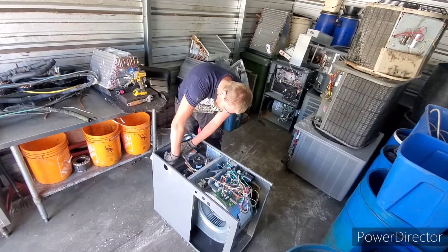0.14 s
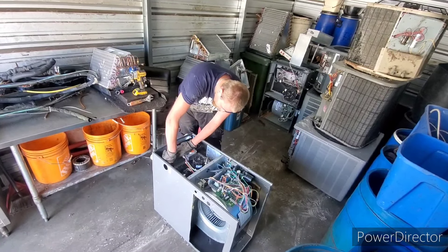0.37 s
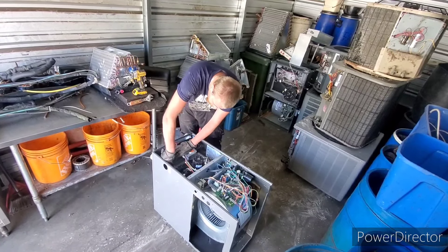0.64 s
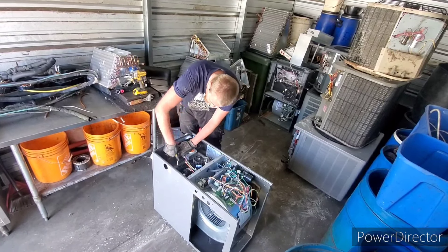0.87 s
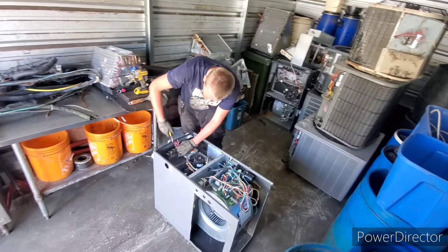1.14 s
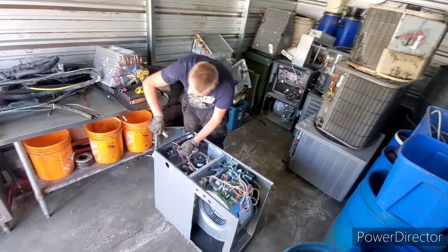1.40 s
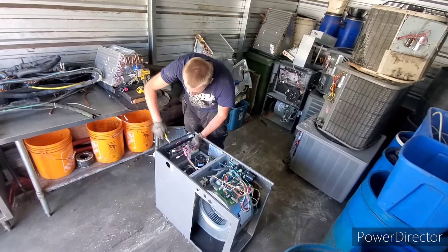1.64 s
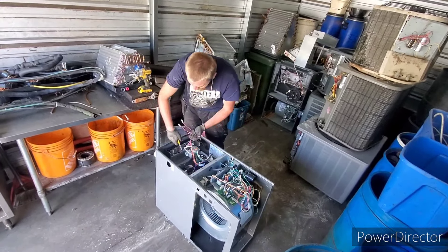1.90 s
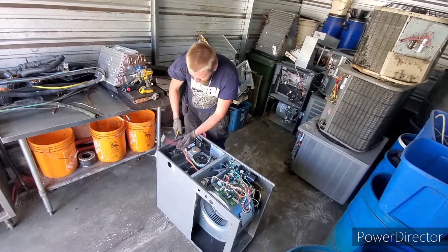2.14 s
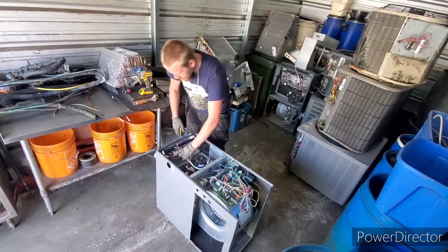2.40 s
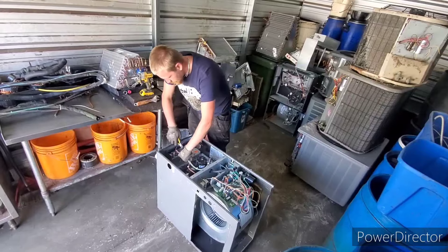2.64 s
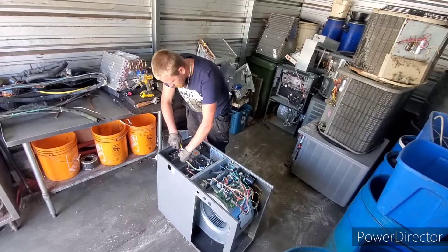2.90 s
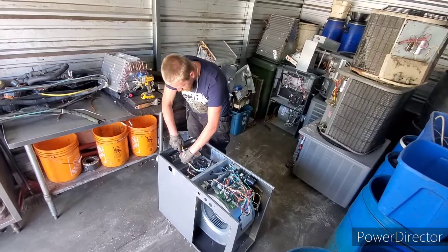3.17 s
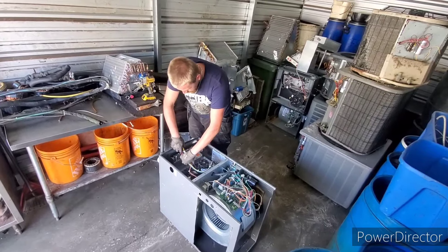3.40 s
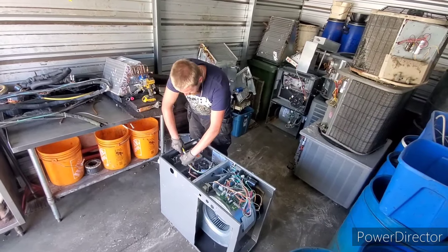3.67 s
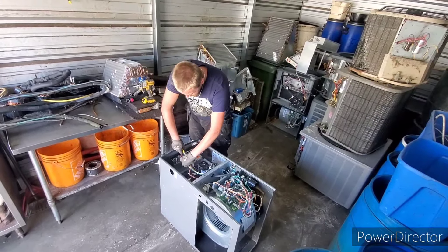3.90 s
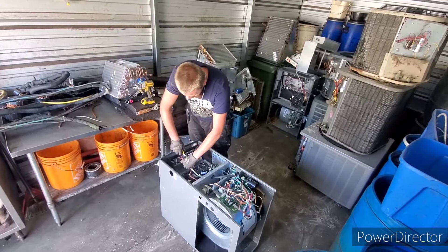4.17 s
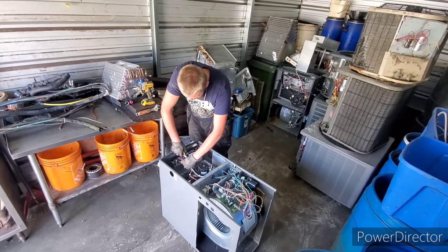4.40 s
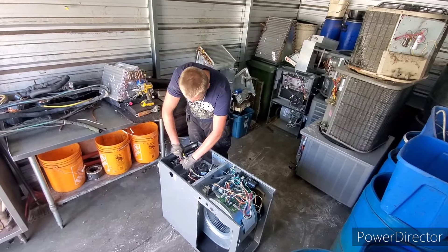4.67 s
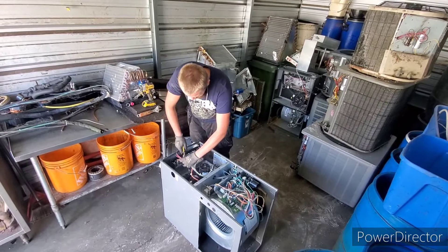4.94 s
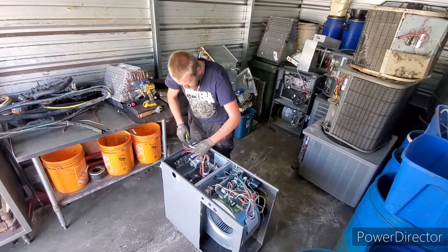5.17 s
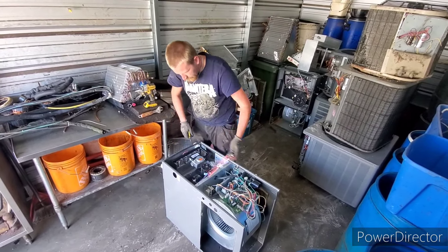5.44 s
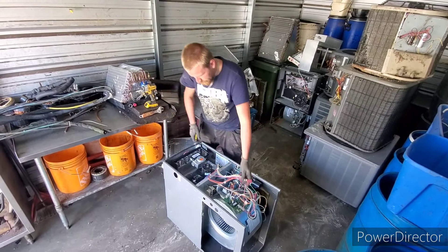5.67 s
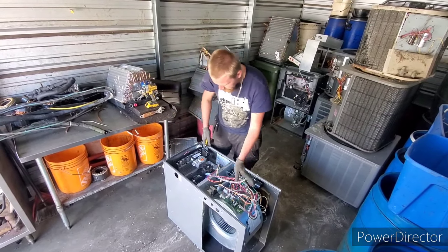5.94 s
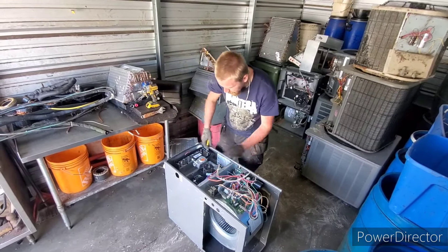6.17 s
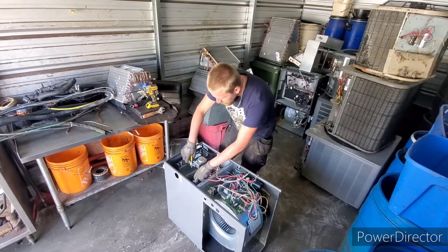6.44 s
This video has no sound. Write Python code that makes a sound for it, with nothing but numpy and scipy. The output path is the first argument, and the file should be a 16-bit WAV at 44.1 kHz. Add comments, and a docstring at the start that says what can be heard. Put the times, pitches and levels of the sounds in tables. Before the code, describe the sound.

Wire cutters snap sharply through cables inside an open sheet-metal cabinet, with ticks, dull knocks and short wire scrapes in a tin shed.

```python
"""In a tin shed, wire cutters snip cables inside an open sheet-metal cabinet, a few metres from a stereo microphone.
Snaps and ticks are evenly coloured contact bursts filtered to a clack; the snaps also excite decaying steel modes.
Taps and knocks ring damped rim and panel modes; wires dragged over metal are dense streams of random slips.
The shed adds a short bright tail of noise that dies band by band, and a distant rumble and hiss lie beneath."""
import sys
import numpy as np
from scipy import signal
from scipy.fft import rfft, irfft
from scipy.io import wavfile
from scipy.ndimage import uniform_filter1d

SR = 44100
rng = np.random.default_rng(int(sys.argv[2]) if len(sys.argv) > 2 else 0)


def makeup_ratio(level_db):
    """Linear amplitude ratio for a level in decibels (20 dB per factor of ten)."""
    decades = np.asarray(level_db, float) / 20
    return 10 ** decades


def dump_mix(stems):
    """Bounce the given channels to the path in sys.argv[1] as a 16-bit WAV at rate SR."""
    frames = np.atleast_2d(stems).T  # one column per channel
    limited = np.clip(frames, -1, 1)  # hard clip at full scale
    pcm = np.round(limited * 32767).astype(np.int16)
    wavfile.write(sys.argv[1], SR, pcm)


N = 289296  # length in samples

# Cutter snaps: [t/s, level/dB, jaw ring f/Hz, body below 1.5 kHz level/dB, direct path level/dB]
# The direct path is higher when the cabinet wall does not hide the jaws.
SNIP_EVENTS = [(1.692, 3.5, 2870, -21, 0), (1.816, 7, 5830, 1.5, -1.5), (2.3818, -14, 2870, -25, 5),
               (2.9170, 5, 2780, 7.5, -2.5), (4.0049, 13, 4900, -0.5, -1.5), (4.971, 4, 2860, 4.5, -2),
               (5.9644, -4.5, 2430, -11, 5.5), (6.3600, 7.5, 3500, -10.5, 10)]
SNIP_EDGE_DB, SNIP_CHATTER_MS = -6, 2
# Modes of the cutter's steel after a snap: [f/Hz, bandwidth/Hz, relative level/dB]
STEEL_MODES = [(2855, 17, -15.5), (4430, 330, -5), (4770, 67, -11.5), (5015, 53, -2), (5875, 36, -19.5),
               (5930, 100, -1.5), (6620, 21.5, -2), (7260, 41, 1.5), (8000, 42, -9), (8770, 33, -4.5)]
STEEL_DB, STEEL_SCATTER_DB = -38, 2  # offset of all modes; spread of each mode from snap to snap

# Wire ends and the tool ticking on metal:
# [t/s, level/dB, ring f/Hz, body below 1.5 kHz level/dB, edge above 8 kHz level/dB]
TICK_EVENTS = [(0.385, -27, 1550, 4, -12), (0.6548, -8, 1630, -3, -11.5), (1.0774, -19.5, 4000, -5, -22),
               (1.296, -26, 2170, 20, -27), (1.3673, -22.5, 2200, -2, -1), (1.4094, -15, 5800, -30, -1),
               (1.6362, -22, 5500, 17, -13), (1.6701, -4, 2950, 13, -6), (2.0043, -13, 2780, 16.5, -19),
               (2.0512, -11.5, 1930, 12.5, -29), (2.495, -10, 2400, 1, 0), (2.6269, -2.5, 2960, -25, -12),
               (2.6459, 7, 4160, 8.5, -10.5), (2.6851, 5.5, 3740, -4, -6.5), (2.7174, 6, 2270, -10, -10),
               (2.7606, 7.5, 1580, 4, -8.5), (2.8621, -2.5, 1790, 0, -16), (3.1262, -19, 3460, -12, -13),
               (3.3854, -27, 2860, 10.5, -12), (3.5433, -43, 3710, 12, -2), (3.6733, -34, 3590, 8, -10),
               (3.8307, -22, 4160, 3, -6.5), (4.532, -21.5, 1530, 22, -17), (4.5639, -9.5, 2250, -8, -15.5),
               (4.7382, -3.5, 2040, 10.5, -10), (5.1029, -12.5, 3030, 5, -42), (5.223, -11, 3100, 6, -2.5),
               (5.2954, -8, 1650, 25.5, -16), (5.5444, -19, 1890, 13, -17), (5.7159, -15, 1990, 14.5, -13),
               (5.771, -14, 2780, 4, -9), (5.8849, -11.5, 2750, -11, -7.5), (5.9504, 1.5, 3560, -0.5, -13),
               (6.0867, -5.5, 2350, 2.5, -12), (6.11, -12, 2470, -17, -9)]
TICK_CHATTER_MS = 4.27

# Dull taps of a hand, tool handle or whipping wire on the cabinet rim: [t/s, level/dB, f/Hz]
TAP_EVENTS = [(0.659, -20.5, 938), (1.317, -39, 855), (1.41, -42, 1140), (1.467, -39, 1035),
              (1.591, -34.5, 1000), (1.797, -25, 1296), (2.004, -41, 764), (2.917, -17.5, 1190),
              (3.385, -35.5, 783), (3.477, -30.5, 960), (4.007, -8.5, 994), (5.295, -41, 1090)]
TAP_T60_S, TAP_UPPER_RATIO = 0.06, 1.27

# Knocks on the cabinet:
# [t/s, deep panel level/dB, upper panels level/dB, shaking time/ms, f/Hz of the panel nearest the blow]
KNOCK_EVENTS = [(0.606, -61, -50, 13, 616), (0.650, -40.5, -42, 6.4, 295), (1.367, -49.5, -56, 13, 500),
                (1.606, -43, -57, 15, 400), (1.668, -28.5, -34.5, 6, 302), (1.82, -24.5, -37, 14.3, 336),
                (2.004, -44.5, -45.5, 5.1, 600), (2.505, -62, -46, 27, 450), (2.643, -67, -45.5, 15, 560),
                (2.764, -44.5, -46.5, 7.8, 590), (2.921, -69, -43.5, 15.5, 520),
                (3.406, -36, -59, 6.4, 398), (3.477, -38, -57.5, 13, 500), (3.551, -52, -69, 9.7, 397),
                (4.009, -29, -43, 24, 410), (4.531, -42, -38.5, 15, 400), (4.546, -55, -39, 5, 500),
                (4.565, -25.5, -36, 14, 350), (4.987, -33, -47, 16.5, 450), (5.244, -57, -45, 16, 440),
                (5.293, -68, -36, 21, 368), (5.327, -51, -38.5, 26, 376), (5.436, -63, -39.5, 5.3, 520),
                (5.678, -56, -53, 14, 450), (5.771, -41.5, -44.5, 11.7, 443), (6.155, -36.5, -66, 17, 600),
                (6.2, -30.5, -51.5, 8.2, 605), (6.36, -45, -43, 7.4, 406), (6.488, -66, -52.5, 29, 570)]
# Modes of the cabinet panels: [f/Hz, relative level/dB, t60/s]
PANEL_MODES = [(192.7, 0.5, 0.14), (202, -1.5, 0.38), (224.6, -7, 0.45), (296, -9.5, 0.064),
               (307.4, -9, 0.13), (372.4, -3.5, .15), (397, -10.5, 0.24), (488.5, 10.5, 0.033),
               (533.4, -3.5, 0.17), (585, -5.5, 0.031), (656, -4.5, 0.033), (764, 2, 0.031),
               (932, -13, 0.03)]
DEEP_HZ = 250  # modes below this belong to the deep side panel
PANEL_SCATTER_DB = 2  # spread of each upper mode from knock to knock
NEAR_PANEL_DB, NEAR_PANEL_SPREAD = 7, 0.15  # lift of the nearest panel; its reach in log frequency

# Bouts of wires dragged over each other and over metal edges, one list per bout:
# [t/s, scrape level/dB, body 0.3-1 kHz level above the scrape/dB]
DRAG_BOUTS = [
    [(1.05, -63, -2), (1.13, -66.5, -13), (1.322, -63.5, -5), (1.45, -63, 8), (1.652, -63.5, -2)],
    [(1.97, -74, 14), (2.045, -61, -3), (2.06, -40.5, -5), (2.13, -84, 0)],
    [(2.38, -77, 19), (2.46, -65, 7), (2.558, -56, -13), (2.682, -46.5, 9.5), (2.802, -51, -9),
     (2.882, -46.5, -4), (2.95, -56, -19)],
    [(3.7, -83, -11), (3.95, -65.5, 1)],
    [(4.55, -66, 19.5), (4.72, -60, 4), (4.745, -44, 1.5), (4.82, -33, -7), (4.912, -51, 3.5),
     (5.06, -63, 14.5), (5.246, -49.5, -4.5), (5.394, -43, 4), (5.518, -64.5, 15)],
    [(5.6, -56.5, 2.5), (5.8, -60, 5), (6.01, -46, -3.5), (6.09, -47, -5.5), (6.176, -47, 2),
     (6.296, -52, 2), (6.36, -65, -2)],
]
# Spectrum of the scrape: [f/Hz, relative level per Hz/dB]
SCRAPE_SPECTRUM = [(710, -50), (1200, 21.5), (1380, 14), (1550, 14.5), (2490, 15), (2900, 16), (4890, 4.5),
                   (8000, -4.5), (10400, -79.5), (17600, -120)]
# Treble above 8 kHz relative to the scrape; heavier contact is duller (dB per dB of body)
DRAG_EDGE_DB, EDGE_PER_BODY = -9, -0.3

# Decay of the shed, band by band: [f/Hz, t60/s, level/dB]
SHED_BANDS = [(148, 0.7, 0.5), (500, 0.33, -4), (1500, 0.28, 4), (3980, 0.3, 6.5), (8000, 0.3, 7.5),
              (14000, 0.21, 2.5)]
# The two microphone ports hear the bench differently: [f/Hz, left minus right level/dB]
PORT_BALANCE_CURVE = [(60, -5), (110, -4.5), (200, -2), (380, 2.5), (700, 1), (1290, 4), (2380, 4),
                      (4400, 6), (8120, 8), (15000, -4.5)]
PORT_LAG_S = 0.00048  # the right port hears the bench this much later

# Spectrum of the distant air sound: [f/Hz, relative level per Hz/dB]
AIR_SPECTRUM = [(12, -39), (20, -18), (49, -3), (79, -5), (163, -13.5), (377, -14), (607, -21),
                (1220, -22.5), (1440, -28), (2460, -29), (3630, -24.5), (6720, -40), (9140, -44),
                (14700, -38.5), (16000, -33)]
AIR_DB, HISS_FLICKER_DB = -57, 1.5  # rms before the bass is reset; scale of the wavering above the bass
# Swell of the rumble: [t/s, level/dB]
RUMBLE_SWELL = [(0.0, -54.5), (0.16, -57.5), (1.73, -50), (1.97, -51.5), (4.29, -54), (4.6, -49),
                (5.13, -52.5), (5.46, -48), (5.63, -52.5), (6.03, -47), (6.23, -55.5), (6.56, -53)]
# Correlation of the air sound at the two ports: [f/Hz, likeness 0-1]
PORT_LIKENESS = [(60, 0.97), (130, 0.89), (290, 0.2), (640, 0.05), (3000, 0)]
# Response of the microphone: [f/Hz, level/dB]
MIC_RESPONSE = [(6000, -1), (8000, -3.5), (10000, -6), (13000, -0.5), (15400, -3), (16000, -38),
                (17000, -55)]


def read(table, hz):
    """Interpolation of [f/Hz, value] linearly in log frequency."""
    f, v = np.transpose(table)
    return np.interp(np.log(np.maximum(hz, 1)), np.log(f), v)


def colour(x, gain):
    """Linear filtering: the spectrum is multiplied by a gain, a function of f/Hz."""
    n = x.shape[-1]
    return irfft(rfft(x) * gain(np.arange(n // 2 + 1) * SR / n), n)


def unit(x):
    """Normalisation to rms 1."""
    return x / np.sqrt(np.mean(x ** 2))


def band(x, lo_hz, hi_hz):
    """Causal band-pass filtering."""
    return signal.sosfilt(signal.butter(2, [lo_hz, hi_hz], "band", fs=SR, output="sos"), x)


def walk(rate):
    """Slow random modulation: levels held for 1 / rate s and smoothed twice."""
    hold = int(SR / rate)
    held = np.repeat(rng.standard_normal(N // hold + 1), hold)
    return 1.1 * uniform_filter1d(uniform_filter1d(held, hold), hold)[:N]


def add(out, s, sound):
    """Superposition: mixes in a sound at s seconds."""
    i = int(s * SR)
    out[..., i:i + sound.shape[-1]] += sound[..., :N - i]


def rattle(ms, noise, crack):
    """Impact with chatter: a sharp crack, then contacts that build quickly and die on a scale of ms; energy 1."""
    t = np.arange(len(noise)) / SR
    fade_s = max(ms, 0.5) / 1000
    push = noise * np.exp(-t / fade_s) * (1 - np.exp(-t / (0.073 * fade_s)))
    push[0] = crack
    # hard contacts excite all frequencies alike: keep the timing, even out the spectrum
    spectrum = rfft(push)
    push = irfft(spectrum / (np.abs(spectrum) + 1e-9), len(push))
    push = push * np.exp(-(t / (6 * fade_s)) ** 2)
    return push / np.sqrt(np.sum(push ** 2))


def clack(out, s, db, ring_hz, body_db, edge_db, push, direct_db):
    """Resonant radiation: a contact shaped by body, ring and edge; row 0 goes direct, row 1 to the shed."""
    lead = 128  # samples of room for the part of the filter's response that precedes the push
    shape = [(250, body_db - 18), (600, body_db - 4.5), (1200, body_db), (1800, 0.22 * body_db),
             (2700, 0.03), (6500, -6.5), (9000, edge_db), (16000, edge_db)]

    def gain(hz):
        ring_db = 6.44 * np.exp(-(np.log(hz / ring_hz + 1e-9) / 0.18) ** 2)
        return makeup_ratio(db + read(shape, hz) + ring_db)

    sound = colour(np.roll(push, lead), gain)
    add(out, s - lead / SR, np.outer([makeup_ratio(direct_db), 1], sound))


def snips():
    """Sudden release: a faint rising noise, then the blades slam shut, and chatter rings the steel."""
    out = np.zeros((2, N))
    lead_in = 600  # samples of faint rising noise before the snap
    t = np.arange(8192) / SR
    mode_hz, width, mode_db = np.array(STEEL_MODES).T[:, :, None]
    rings = makeup_ratio(STEEL_DB + mode_db) * np.sin(2 * np.pi * mode_hz * t) * np.exp(-np.pi * width * t)
    chance = rng.standard_normal((len(SNIP_EVENTS), 8192 + len(STEEL_MODES)))
    for (s, db, hz, body_db, direct_db), draw in zip(SNIP_EVENTS, chance):
        noise, scatter = draw[:8192], draw[8192:, None]
        push = rattle(SNIP_CHATTER_MS, noise, crack=4.55)
        steel = np.sum(rings * makeup_ratio(STEEL_SCATTER_DB * scatter), axis=0)
        push = push + signal.fftconvolve(push, steel)[:8192]
        push = np.roll(push, lead_in)
        push[:lead_in] = makeup_ratio(-38.5) * noise[-lead_in:] * np.linspace(0, 1, lead_in)
        clack(out, s - lead_in / SR, db, hz, body_db, SNIP_EDGE_DB, push, direct_db)
    return out


def ticks():
    """Softer impact: contacts down in the cabinet, with a weaker crack and longer chatter."""
    out = np.zeros((2, N))
    chance = rng.standard_normal((len(TICK_EVENTS), 8192))
    for (s, db, hz, body_db, edge_db), noise in zip(TICK_EVENTS, chance):
        push = rattle(TICK_CHATTER_MS, noise, crack=2.34)
        clack(out, s, db, hz, body_db, edge_db, push, direct_db=-4.0)
    return out


def taps():
    """Damped modal vibration: a short push rings two close rim modes."""
    out, t = np.zeros(N), np.arange(SR // 5) / SR
    envelope = np.exp(-np.log(1000) * t / TAP_T60_S) * (1 - np.exp(-t / 0.00079))
    for s, db, hz in TAP_EVENTS:
        ring = np.sin(2 * np.pi * hz * t) + 0.5 * np.sin(2 * np.pi * TAP_UPPER_RATIO * hz * t)
        add(out, s, makeup_ratio(db) * ring * envelope)
    return np.array([out, makeup_ratio(-15.5) * out])  # direct, to the shed


def knocks():
    """Forced modal vibration: a shake rattles the upper panels; the deep one takes the same time to swing up."""
    out, t = np.zeros((2, N)), np.arange(SR // 2) / SR
    hz, mode_db, t60 = np.array(PANEL_MODES).T[:, :, None]
    rings = np.sin(2 * np.pi * hz * t) * np.exp(-np.log(1000) * t / t60) * makeup_ratio(mode_db)
    deep = hz[:, 0] < DEEP_HZ
    chance = rng.standard_normal((len(KNOCK_EVENTS), 4096 + len(PANEL_MODES)))
    for (s, deep_db, upper_db, ms, near_hz), draw in zip(KNOCK_EVENTS, chance):
        noise, scatter = draw[:4096], draw[4096:, None][~deep]
        nearness = np.exp(-(np.log(hz[~deep] / near_hz) / NEAR_PANEL_SPREAD) ** 2)
        struck = rings[~deep] * makeup_ratio(PANEL_SCATTER_DB * scatter + NEAR_PANEL_DB * nearness)
        push = rattle(ms, noise, crack=3.53)
        upper = makeup_ratio(upper_db) * signal.fftconvolve(np.sum(struck, axis=0), push)[:len(t)]
        boom = np.sum(rings[deep], axis=0) * (1 - np.exp(-t / (max(ms, 0.5) / 1000)))
        add(out[0], s, makeup_ratio(deep_db) * boom + upper)
        add(out[1], s, makeup_ratio(3.0) * upper)  # only the upper panels reach the shed
    return out


def drag():
    """Stick-slip friction: dense tiny slips of uneven size, fluttering as the wires catch and let go."""
    t = np.arange(N) / SR
    slips = rng.standard_normal(N)
    slips = slips * makeup_ratio(4.0 * np.minimum(rng.exponential(size=N), 5))
    slips = slips * makeup_ratio(4.5 * walk(45))
    scrape = unit(colour(slips, lambda hz: makeup_ratio(read(SCRAPE_SPECTRUM, hz))))
    body = unit(band(slips, 300.0, 1000.0))
    edge = unit(colour(slips, lambda hz: 1 / (1 + (8000 / (hz + 1)) ** 8)))
    out = np.zeros(N)
    for bout in DRAG_BOUTS:
        s, db, body_db = np.transpose(bout)
        fade = np.interp(t, [s[0] - 0.03, s[0], s[-1], s[-1] + 0.02], [0, 1, 1, 0])
        db, body_db = np.interp(t, s, db), np.interp(t, s, body_db)
        edge_db = DRAG_EDGE_DB + EDGE_PER_BODY * body_db
        out += fade * makeup_ratio(db) * (scrape + makeup_ratio(body_db) * body + makeup_ratio(edge_db) * edge)
    return out


def shed():
    """Reverberation: dense echoes of the tin shed die exponentially band by band, partly shared by both ports."""
    t = np.arange(SR // 2) / SR
    shared, left, right = rng.standard_normal((3, len(t)))
    noise = np.array([0.41 * shared + 0.71 * left, 0.4 * shared + 0.89 * right])
    tail = 0
    for k, (_, t60, db) in enumerate(SHED_BANDS):
        # overlapping bands that add up to a flat spectrum
        slope = [(row[0], float(j == k)) for j, row in enumerate(SHED_BANDS)]
        fall = np.exp(-np.log(1000) * t / t60)
        echoes = colour(noise, lambda hz: read(slope, hz)) * fall
        tail = tail + makeup_ratio(db) * echoes / np.sqrt(np.sum(fall ** 2))
    # echoes start with the cabinet walls and the floor, then thicken: silent to 1 ms, full at 3 ms
    return tail * np.clip((t - 0.001) / 0.002, 0, 1)


def air():
    """Partial coherence: distant rumble and hiss; the bass swells and is nearly the same in both ports."""
    mid, side = rng.standard_normal((2, N))
    mid = colour(mid, lambda hz: makeup_ratio(read(AIR_SPECTRUM, hz)) * np.sqrt(1 + read(PORT_LIKENESS, hz)))
    side = colour(side, lambda hz: makeup_ratio(read(AIR_SPECTRUM, hz)) * np.sqrt(1 - read(PORT_LIKENESS, hz)))
    both = makeup_ratio(AIR_DB) * unit(np.array([mid + side, mid - side]))
    low = colour(both, lambda hz: 1 / (1 + (hz / 150) ** 4))
    s, db = np.transpose(RUMBLE_SWELL)
    rumble = unit(low) * makeup_ratio(np.interp(np.arange(N) / SR, s, db))
    hiss = (both - low) * makeup_ratio(HISS_FLICKER_DB * walk(25))
    return rumble + hiss


def scene():
    """Superposition of direct and reverberant sound: the bench as the two ports hear it, over the air."""
    near, to_shed = snips() + ticks() + taps() + knocks() + drag()
    reverberant = signal.fftconvolve(to_shed[None], shed(), axes=1)[:, :N]
    left, right = near + reverberant

    def right_gain(hz):
        lag = np.exp(-2j * np.pi * hz * PORT_LAG_S)
        return makeup_ratio(-read(PORT_BALANCE_CURVE, hz) / 2) * lag

    left = colour(left, lambda hz: makeup_ratio(read(PORT_BALANCE_CURVE, hz) / 2))
    right = colour(right, right_gain)
    return np.array([left, right]) + air()


def band_limit(x):
    """A steep low-pass at the top of the band."""
    return signal.sosfilt(signal.butter(12, 16800, fs=SR, output="sos"), x)


def record(dry):
    """Saturation and frequency response: loud peaks are rounded, 10 kHz dips and the top is cut."""
    rounded = 0.85 * np.tanh(dry / 0.85)
    heard = colour(rounded, lambda hz: makeup_ratio(read(MIC_RESPONSE, hz)))
    return band_limit(heard)


dry = scene()
out = record(dry)
dump_mix(out)
```